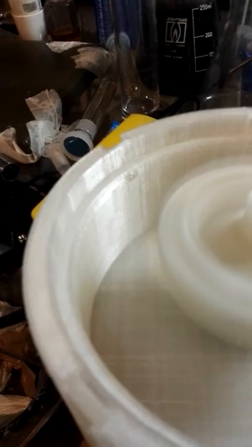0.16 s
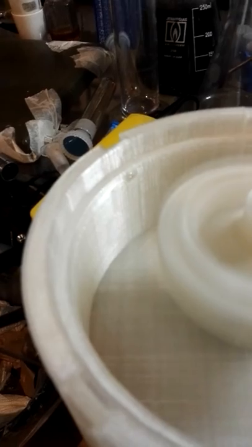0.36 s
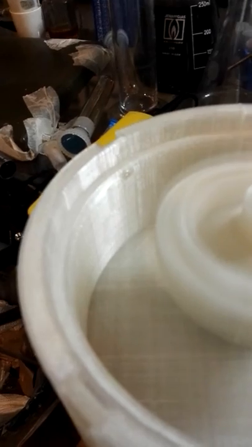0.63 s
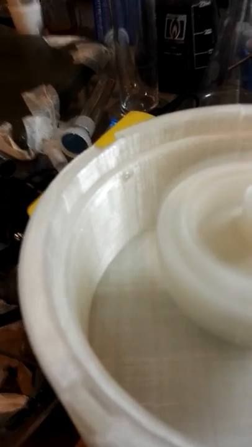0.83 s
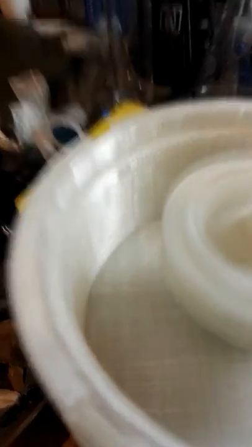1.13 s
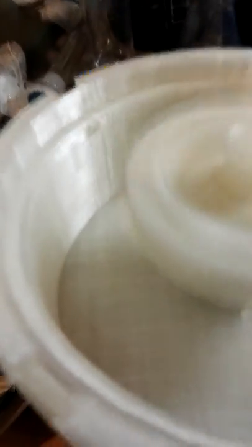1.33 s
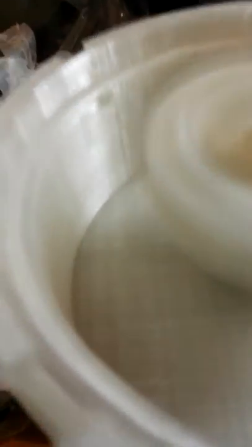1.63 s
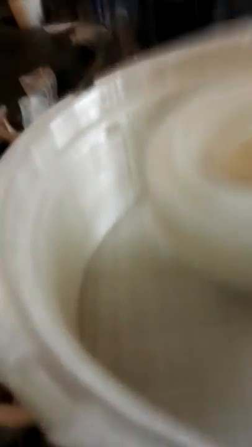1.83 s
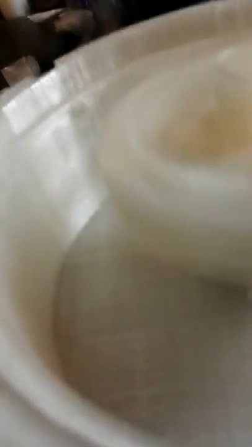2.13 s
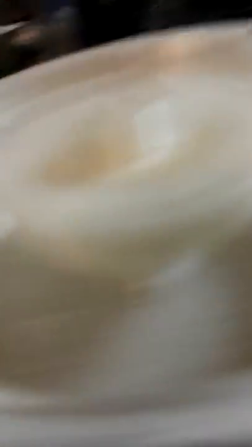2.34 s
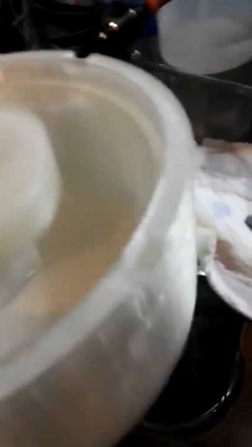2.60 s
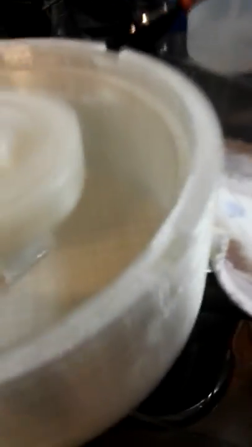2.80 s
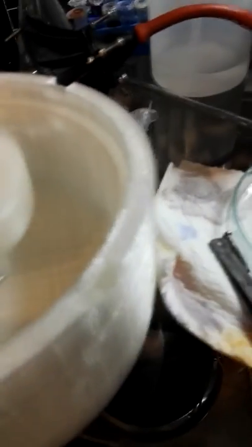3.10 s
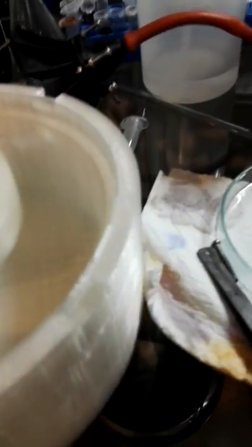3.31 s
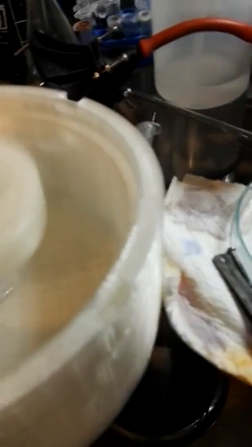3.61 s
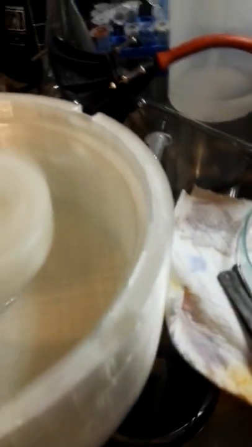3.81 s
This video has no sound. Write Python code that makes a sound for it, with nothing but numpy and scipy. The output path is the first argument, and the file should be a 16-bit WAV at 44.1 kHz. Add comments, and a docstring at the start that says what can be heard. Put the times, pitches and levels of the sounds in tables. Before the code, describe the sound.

A small motor hums throughout, spinning a plastic bowl: a buzzing tone around 1 kHz, throbbing nearly fifty times a second, with rapid casing rattle and broad whirr, creeping up in speed. Four loud gritty plastic snaps, leaning right, fall at 1.1-1.35 s; faint low air rumble at left until about 2 s. Treble hiss brushes right at 2.1-2.3 s. Tone and side shift as the close microphone swings. Dull knocks at 2.8 and 3.7-3.95 s, with a tiny click at 3.8 s.

```python
"""A small motor spins a plastic bowl on a workbench, still gaining speed: hum lines on the shaft speed, loose
parts that ring its casing each turn, and banded noise, heard by a hand-held stereo recorder that swings to the
other side. Low noise brushes the ports, the left most, and near-sines moan faintly. From one second, five snaps
(clicks, bursts and ringing plastic) lean right, the last one near the end. Midway the treble hisses briefly at
the right; in the last stretch some of the motor's knocks come out stronger, as short dull bursts near 900 Hz
made by ringing sines, one of them louder than the rest."""
import sys
import numpy as np
from scipy import signal
from scipy.io import wavfile

SR = 44100
rng = np.random.default_rng(int(sys.argv[2]) if len(sys.argv) > 2 else 0)


def to_wav(s):
    """Save 16-bit WAV."""
    ch = np.atleast_2d(s).T  # columns
    pcm = np.round(np.clip(ch, -1, 1) * 32767)  # PCM
    wavfile.write(sys.argv[1], SR, pcm.astype(np.int16))


def invert_db(level):
    """Linear amplitude ratio for a level in decibels (20 dB per decade), elementwise."""
    return 10 ** (np.asarray(level, dtype=float) / 20)


N = 174195

# Plastic snaps. Each row: time in seconds, relative strength in dB, time to fall 60 dB in seconds.
SNAP_EVENTS = [(1.077, -19.5, 0.28), (1.137, -8, 0.23), (1.222, -8.5, 0.16), (1.3455, -5, 0.2),
               (3.8134, -21.5, 0.015)]


def rms_one(x):
    """Scale to rms 1."""
    return x / np.sqrt(np.mean(x ** 2) + 1e-20)


def in_time(rows):
    """Columns of a curve, sample by sample."""
    s, *columns = np.transpose(rows)
    return [np.interp(np.arange(N) / SR, s, c) for c in columns]


def at_hz(points, hz):
    """Read a spectrum curve on a log frequency axis."""
    point_hz, value = np.transpose(points)
    return np.interp(np.log(hz), np.log(np.maximum(point_hz, 1)), value)


def blend(before, after, swing):
    """Value on the way of the swing, 0 to 1."""
    return before + (after - before) * swing


def sides(db):
    """Left and right gains for a left-minus-right difference in dB."""
    return invert_db(np.array([db / 2, -db / 2]).reshape(2, -1))


def drift(rate):
    """Slow chance of rms 1: noise through two equal poles at this rate in Hz."""
    r = np.exp(-80 * np.pi * rate / SR)  # runs at a fortieth of the sample rate
    noise = rng.standard_normal(N // 40 + 2002)
    slow = signal.lfilter([1], [1, -2 * r, r * r], noise)[2000:]
    return np.interp(np.arange(N) / 40, np.arange(len(slow)), rms_one(slow))


def ring(clicks, hz, t60):
    """A unit click sets a dying sine of starting height 1 ringing."""
    r, w = invert_db(-60 / (t60 * SR)), 2 * np.pi * hz / SR
    return signal.lfilter([0, np.sin(w)], [1, -2 * r * np.cos(w), r * r], clicks + 1e-18)


def bands(x, low_hz):
    """Third-octave slices of x[0] and x[1] in turn, with their centres in Hz."""
    edges = low_hz * 2 ** np.arange(0, np.log2(19000 / low_hz), 1 / 3)
    for k, (low, high) in enumerate(zip(edges, edges[1:])):
        sos = signal.butter(2, [low, high], "band", fs=SR, output="sos")
        yield np.sqrt(low * high), signal.sosfilt(sos, x[k % 2])


def bump(start, length):
    """Smooth half-sine swell; start and length in seconds."""
    return np.sin(np.pi * np.clip((np.arange(N) / SR - start) / length, 0, 1))


def hum(turn, swing):
    """Clean lines on multiples of the shaft speed, nearly in step, so that they throb once a turn."""
    # Each row: multiple of shaft speed, then relative level in dB before, midway and after the swing,
    # first the three at the left, then the three at the right.
    lines = [(1, -61, -54, -60, -54, -54, -56), (12, -51, -45, -44, -64, -61, -56),
             (13, -44, -43, -46, -50, -49, -49), (14, -44, -45, -45, -49, -52, -57),
             (15, -48, -45, -43, -55, -56, -50), (16, -58, -56, -57, -53, -49, -59),
             (17, -59, -52, -51, -68, -60, -58), (18, -41, -41, -44, -46, -50, -44),
             (19, -40, -36, -36, -44, -48, -40), (20, -48, -40, -43, -41, -42, -45),
             (21, -46, -40, -45, -44, -37, -33.5), (22, -34, -39, -54, -32, -31, -32),
             (23, -50, -55, -59, -51, -49, -51), (24, -63, -54, -63, -58, -49, -45),
             (27, -58, -56, -55, -61, -57, -62)]
    throb_turn, right_lag_turn = .035, .013
    smear_rad = .35  # phase bend by squared distance from the centre multiple
    waver_db, waver_rad, flutter_db = 1.7, 0.25, .4
    out = np.zeros((2, N))
    flutter = flutter_db * drift(4)  # shared by all lines
    centre = blend(20.3, 21.5, swing)
    for k, *db in lines:
        waver = waver_rad * drift(7.9)
        for c in range(2):
            phase = 2 * np.pi * k * (turn - throb_turn - c * right_lag_turn)
            phase = phase - smear_rad * (k - centre) ** 2 + waver
            level_db = np.interp(swing, [0, .5, 1], db[3 * c:3 * c + 3])
            gain = np.sqrt(2) * invert_db(level_db + waver_db * drift(5.3) + flutter)
            out[c] -= gain * np.cos(phase)
    return out


def knock_times(turn):
    """Sample of every knock (turns x knocks), from the shaft angle, and its relative dB."""
    # The pattern of one turn. Each row: share of a turn, relative strength in dB.
    pattern = [(.91, 0), (.965, -2), (.04, 0), (.45, -7), (.68, -5)]
    share, db = np.transpose(pattern)
    place = np.arange(int(turn[-1]))[:, None] + share
    return np.interp(place, turn, np.arange(N)).astype(int), db


def knocks(turn, swing):
    """Loose parts knock in one pattern every turn and ring the modes of the casing."""
    # Casing modes. Each row: frequency in Hz, relative level in dB before, midway and after the swing,
    # left minus right in dB before and after, time to fall 60 dB in seconds.
    casing = [(950, 1, -4.5, 15.5, -16, -24.5, 0.011), (1630, 8, -11, 8, -14, 2, 0.015),
              (2050, -5, -7, 4, 3, 1, .012), (2534, 1, 6, 1, -3, 5, 0.022),
              (3326, -5, -4.5, -3, 5, 3, 0.009), (3950, -3, 3, -5, 3, 2, 0.011),
              (4450, 5, 0, 1, -5, 10, 0.007), (4800, 5, -3, 6, -4, 7, 0.009),
              (5800, 0, -14, 11.5, -14, -9.5, 0.011), (6510, 4.5, 6, -3, 20, 17, 0.0053),
              (7506, 4.5, 13.5, 3, -8, -4, .007)]
    level_rms_db, scatter_db, wander_db = -40.5, 3, 3.5
    at, db = knock_times(turn)
    out = 0
    for hz, *level_db, side_before, side_after, t60 in casing:
        clicks = np.zeros((2, N))
        scatter = scatter_db * rng.standard_normal(at.shape)
        clicks[:, at] = invert_db(db + scatter + wander_db * drift(1.03)[at])
        # every mode answers a few samples late, each side by its own lag
        lags = rng.integers(0, 30) + rng.integers(0, 6, 2)
        clicks = np.array([np.roll(c, lag) for c, lag in zip(clicks, lags)])
        gain = invert_db(np.interp(swing, [0, .5, 1], level_db))
        gain = gain * sides(blend(side_before, side_after, swing))
        out = out + gain * ring(clicks, hz, t60)
    return invert_db(level_rms_db) * rms_one(out)


def shudder(turn, swing):
    """Knocks through a dense dying noise response, which changes as the recorder swings."""
    t60_s, scatter_db = .035, -1
    at, db = knock_times(turn)
    clicks, out = np.zeros(N), 0
    clicks[at] = invert_db(db + scatter_db * rng.standard_normal(at.shape))
    decay = invert_db(-60 * np.arange(4096) / SR / t60_s)
    for place in np.linspace(0, 1, 4):  # crossfade four responses along the swing
        response = rng.standard_normal((2, 4096)) * decay
        near = np.cos(np.pi / 2 * np.clip(3 * np.abs(swing - place), 0, 1))
        out = out + near * signal.fftconvolve(clicks[None], response, axes=1)[:, :N]
    return rms_one(out)


def whirr(turn, swing):
    """Broad noise of bearings and air, partly pulsing each turn; the swing shifts its colour and side."""
    # Colour before and after the swing. Each row: frequency in Hz, relative level in dB per Hz.
    colour_before = [(15, -42), (25, -37), (160, -14), (287, -7.5), (428, -16.5), (1030, -8), (1240, -14.5),
                     (2460, -17), (2970, -34), (3210, -19.5), (4910, -15), (5320, -20), (7710, -21),
                     (14200, -33)]
    colour_after = [(15, -44), (25, -27.5), (272, -8.5), (428, -12.5), (620, -10), (787, -8), (1050, -9),
                    (1240, -15), (2530, -13), (3670, -20), (4780, -18.5), (9290, -28.5), (12400, -26),
                    (14200, -39)]
    # Stereo lean before and after the swing. Each row: frequency in Hz, left minus right in dB.
    lean_before = [(60, 26), (130, -5), (290, 1), (630, 5.5), (1390, 6), (3050, -1), (6700, -4.5),
                   (14700, -17.5)]
    lean_after = [(60, -5), (130, 0.5), (290, 3), (630, 5.5), (1390, -2), (3050, 5.5), (6700, 9.5),
                  (14700, -6)]
    # Each row: frequency in Hz, likeness of the steady noise left to right, -1 to 1.
    likeness = [(60, 0.45), (180, 0.44), (540, 0.86), (1630, -0.36), (4890, -0.055), (14700, 0.11)]
    # Each row: frequency in Hz, share of the power that shudders with the knocks, 0 to 1.
    pulsing = [(300, 0.11), (600, 0), (1100, 0.41), (2000, 0.62), (4500, 0.71), (8000, 0.84), (14000, 0.09)]
    db_before, db_after, patchy_db = -37, -35.5, 1.04
    out, power = 0, np.zeros(2)
    beat = shudder(turn, swing)
    sources = np.concatenate([rng.standard_normal((2, 2, N)), [beat, beat]], axis=1)
    for hz, (mid, side, *pulse) in bands(sources, low_hz=24.57):
        share = np.clip(at_hz(pulsing, hz), 0, .95)
        alike = np.clip(at_hz(likeness, hz), -.95, .95)
        ends = at_hz(colour_before, hz), at_hz(colour_after, hz)
        power += invert_db(np.array(ends)) ** 2 * np.mean(mid ** 2)
        lean = blend(at_hz(lean_before, hz), at_hz(lean_after, hz), swing)
        gain = invert_db(blend(*ends, swing) + patchy_db * drift(11.5)) * sides(lean)
        steady = np.sqrt(1 + alike) * mid + np.sqrt(1 - alike) * side * [[1], [-1]]
        pulses = np.sqrt(2 * share) * np.array(pulse)
        out = out + gain * (np.sqrt(1 - share) * steady + pulses)
    return out * invert_db(blend(db_before, db_after, swing)) / blend(*np.sqrt(power), swing)


def gusts():
    """Air on the ports: low noise, its own in each port, stronger at the left."""
    # Each row: time in seconds, relative level in dB.
    strength = [(0, -51), (1.17, -52), (1.2, -31.5), (1.24, -46.5), (1.45, -47), (1.55, -36), (1.66, -45),
                (1.8, -37.5), (1.88, -45.5), (2.1, -43), (2.45, -44.5), (3.95, -51.5)]
    lift_db, right_db = 4.5, -13.5
    sos = signal.butter(2, [22, 128], "band", fs=SR, output="sos")
    low = signal.sosfilt(sos, rng.standard_normal((2, N)))
    return invert_db(in_time(strength)[0] + lift_db) * rms_one(low) * invert_db(np.array([[0], [right_db]]))


def moans():
    """Faint, low near-sines that swell and arch in pitch."""
    # Each row: start in seconds, length in seconds, base pitch in Hz, rise of the arch in Hz,
    # level in dB, left minus right in dB.
    notes = [(0.047, 0.3, 200, 38, -43, -1), (2.457, 0.24, 247.5, 7.9, -47.5, -1)]
    out = 0
    for s, length, hz, arch_hz, db, side_db in notes:
        swell = bump(s, length)
        gain = sides(side_db) * invert_db(db + 2.0 * drift(6)) * np.sqrt(2 * swell)
        pitch_hz = hz + arch_hz * swell + 4 * drift(12.0)
        out = out + gain * np.sin(2 * np.pi * np.cumsum(pitch_hz) / SR)
    return out


def snaps():
    """Click, crack, rebound and gritty burst that dies away, treble first, then the room's tail."""
    # Each row: frequency in Hz, relative level in dB.
    colour = [(530, -27), (900, -5.5), (1050, -2.5), (1440, -4.5), (4160, -4.5), (5020, -8), (11400, -11),
              (14300, -14.5), (15000, -36)]
    # Each row: frequency in Hz, left minus right in dB.
    lean = [(60, 7.5), (180, 0.5), (540, 0), (1630, -3.5), (4890, -1), (14700, -21.5)]
    rise_s, crack_db, crack_s = 0.0015, 4.5, 0.0026
    rebound_s, rebound_db = 0.0107, -26
    tail_db, tail_t60_s = -12.5, 1
    grit_per_s, grit_db = 6000, 3.0
    click_db, click_late_s = 16.5, 0.0017
    treble_loss_db_per_s_khz, treble_loss_s = 10.5, 0.041
    overall_db = 0.5
    t, shape, tail = np.arange(N) / SR, 0, 0
    for s, db, t60 in SNAP_EVENTS:
        for late, loss_db in [(0, 0), (rebound_s, rebound_db)]:
            u = np.maximum(t - s - late + rise_s, 0)
            rise = invert_db(db + loss_db) * (1 - np.exp(-u / rise_s))
            shape = shape + rise * (invert_db(-60 * u / t60) + invert_db(crack_db) * np.exp(-u / crack_s))
            # short snaps leave less of a tail
            tail = tail + rise * invert_db(tail_db - 60 * u / tail_t60_s) * min(t60 / 0.37, 1)
    size = (2, 2, N)  # two noise sets for alternate bands, left and right in each
    grains = rng.random(size) < grit_per_s / SR
    grain_height = invert_db(grit_db * np.minimum(rng.exponential(1, size), 3))
    grit = grains * grain_height * rng.choice([-1, 1], size)
    burst = rms_one(grit + 0.35 * rng.standard_normal(size)) * shape
    source = burst + tail * rng.standard_normal(size)
    s, db, _ = np.transpose(SNAP_EVENTS)
    source[..., ((s + click_late_s) * SR).astype(int)] += invert_db(db + click_db)
    since = np.clip(t - s[np.maximum(np.searchsorted(s, t) - 1, 0)], 0, treble_loss_s)
    source[1] = source[0] * 0.71 + source[1] * 0.65  # neighbouring bands partly share their noise
    out = 0
    for hz, x in bands(source, low_hz=507.3):
        loss_db = treble_loss_db_per_s_khz * since * hz / 1000
        out = out + invert_db(at_hz(colour, hz) - loss_db) * sides(at_hz(lean, hz)) * x
    return invert_db(overall_db) * out


def snap_body():
    """Each snap rings the plastic, every mode with a strength of its own."""
    # Each row: frequency in Hz, left level in dB relative to the snap, time to fall 60 dB in seconds.
    modes = [(1063, -23, 0.1), (1307, -31.5, 0.16), (1645, -27, 0.13)]
    right_db, scatter_db = 5, 3
    s, db, _ = np.transpose(SNAP_EVENTS)
    out = np.zeros((2, N))
    for hz, level_db, t60 in modes:
        clicks = np.zeros((2, N))
        strength_db = db + level_db + scatter_db * rng.standard_normal(len(s))
        clicks[:, (s * SR).astype(int)] = invert_db(strength_db + [[0], [right_db]])
        out += ring(clicks, hz, t60)
    return out


def rustles():
    """Short swells of treble hiss, stronger at the right."""
    # Each row: start in seconds, length in seconds, level in dB before the treble filter.
    swells = [(2.102, 0.091, -37), (2.2, 0.14, -37.5)]
    left_db = -9
    sos = signal.butter(2, 8000, "high", fs=SR, output="sos")
    hiss = signal.sosfilt(sos, rng.standard_normal((2, N)))
    envelope = sum(invert_db(db) * bump(s, length) for s, length, db in swells)
    return hiss * envelope * invert_db(np.array([[left_db], [0]]))


def dull_bursts():
    """Some stronger motor knocks, as short dull bursts of dying sines near 900 Hz, one of them louder than the
    rest."""
    # Each row: time in seconds, strength in dB.
    hits = [(2.83, -35), (3.733, -30), (3.771, -24), (3.836, -31.5), (3.857, -32), (3.92, -32),
            (3.941, -33)]
    # Ringing sines. Each row: frequency in Hz, level in dB relative to the hit,
    # time to fall 60 dB in seconds.
    modes = [(457, -14, 0.11), (850, -12, 0.083), (924, 2, 0.053), (966, -11.5, 0.4), (965, 0, .04)]
    scatter_db = 2.0
    s, db = np.transpose(hits)
    out = np.zeros((2, N))
    for hz, level_db, t60 in modes:
        clicks = np.zeros((2, N))
        scatter = scatter_db * rng.standard_normal((2, len(s)))
        clicks[:, (s * SR).astype(int)] = invert_db(db + level_db + scatter)
        out += ring(clicks, hz, t60)
    return out


def scene():
    """Spin the shaft up, swing the recorder, and add motor, air, snaps, hiss and dull bursts."""
    # Path of the recorder. Each row: time in seconds, swing from 0 to 1,
    # gain of hum and knocks in dB.
    path = [(0, 0.19, 0.5), (.6, 0.08, -1), (1.05, 0.25, -2), (1.5, 0.47, -1), (2, 0.5, -2.5),
            (2.4, 0.73, -1), (3, 0.78, -1), (3.6, 0.94, -2), (3.72, 0.84, -0.5), (3.83, 0.75, -1),
            (3.95, 0.88, -0.5)]
    start_turn, full_speed_hz, short_by_hz, settle_s = .01, 48.3, 1.57, 1.08
    speed_hz = full_speed_hz - short_by_hz * np.exp(-np.arange(N) / SR / settle_s)
    turn = start_turn + np.cumsum(speed_hz) / SR
    swing, level_db = in_time(path)
    swing = np.clip(swing, 0, 1)
    motor = invert_db(level_db) * (hum(turn, swing) + knocks(turn, swing)) + whirr(turn, swing)
    return motor + gusts() + moans() + snaps() + snap_body() + rustles() + dull_bursts()


def top_cut(x):
    """Nothing passes above the cut-off."""
    return signal.sosfilt(signal.butter(12, 15290, fs=SR, output="sos"), x)


def record(dry):
    """A steep low-pass takes off the top: 50 dB down from 14850 Hz."""
    low_pass = signal.cheby2(18, 50, 14850, fs=SR, output="sos")
    mix = signal.sosfilt(low_pass, dry)
    return top_cut(mix)


dry = scene()
out = record(dry)
to_wav(out)
```